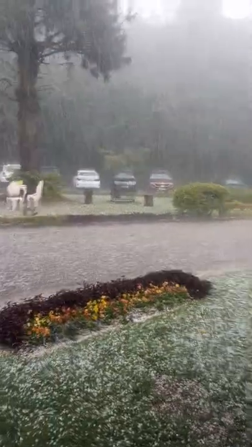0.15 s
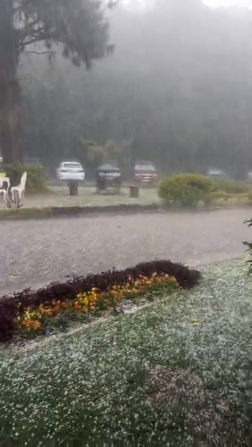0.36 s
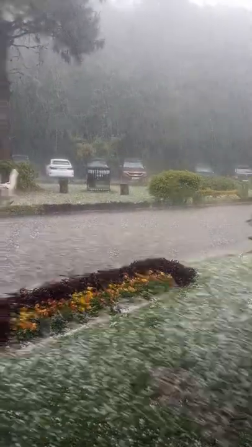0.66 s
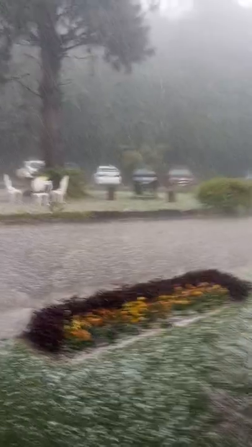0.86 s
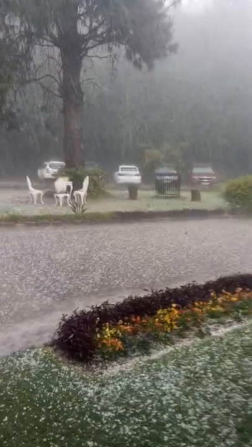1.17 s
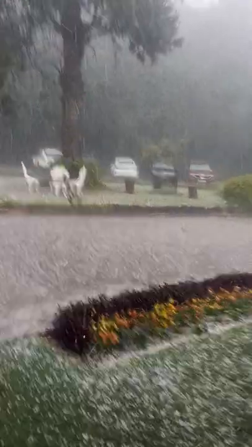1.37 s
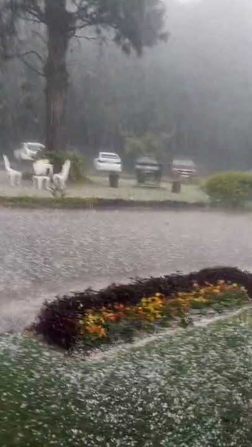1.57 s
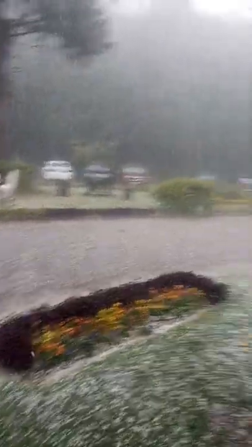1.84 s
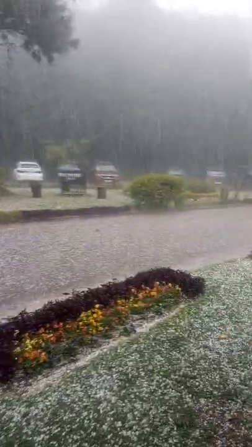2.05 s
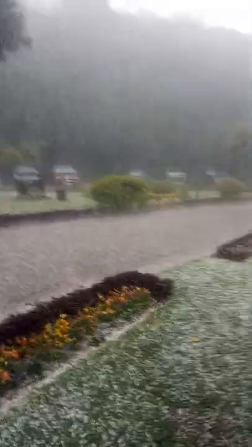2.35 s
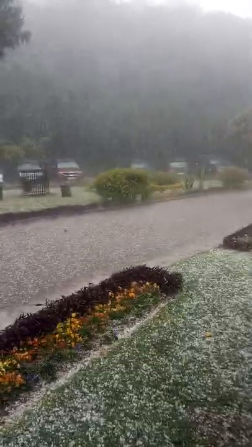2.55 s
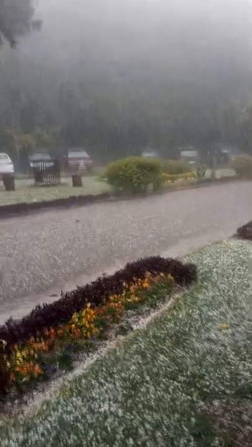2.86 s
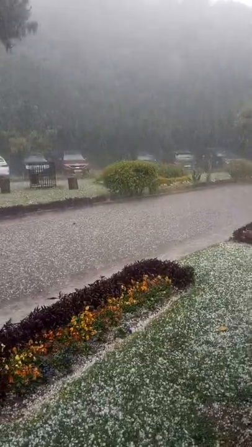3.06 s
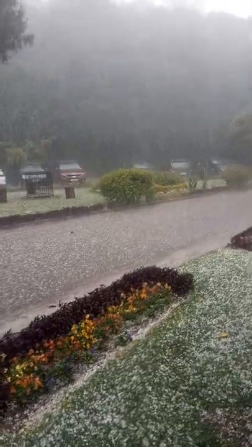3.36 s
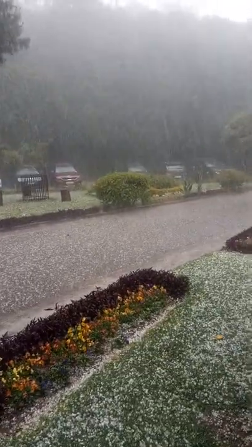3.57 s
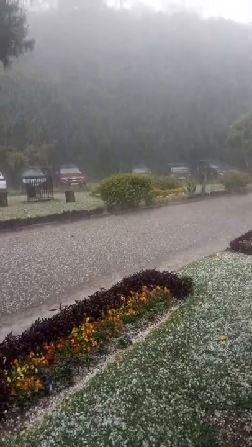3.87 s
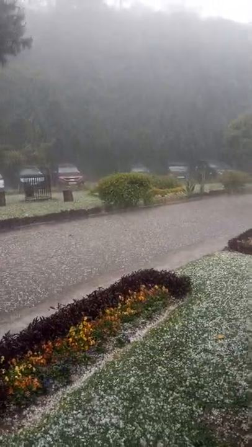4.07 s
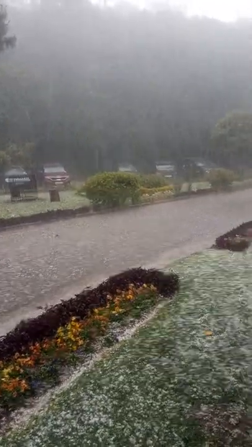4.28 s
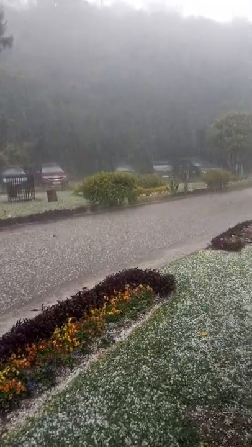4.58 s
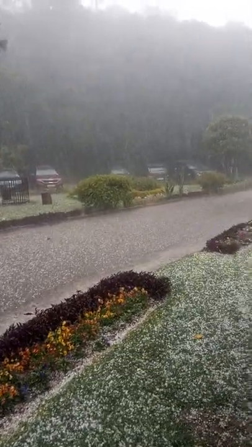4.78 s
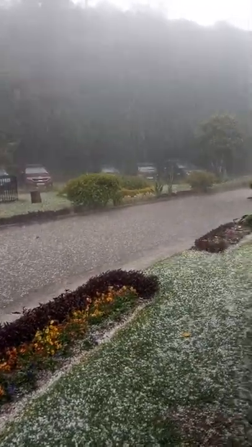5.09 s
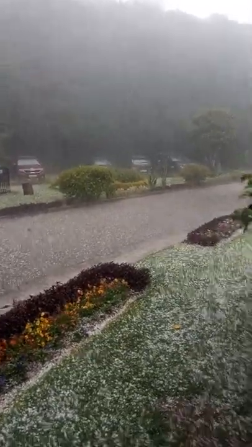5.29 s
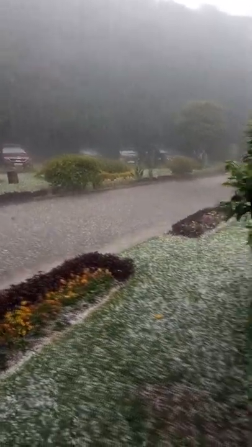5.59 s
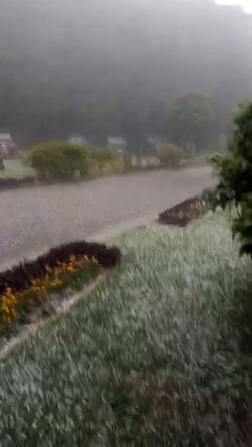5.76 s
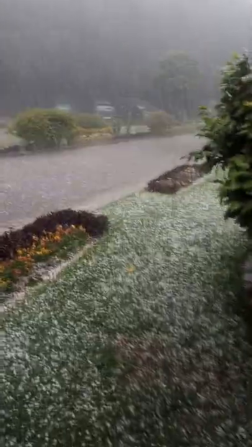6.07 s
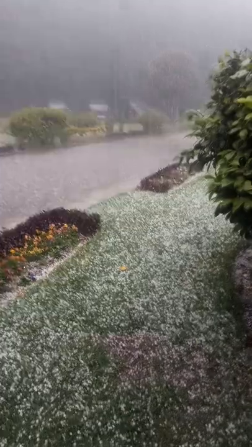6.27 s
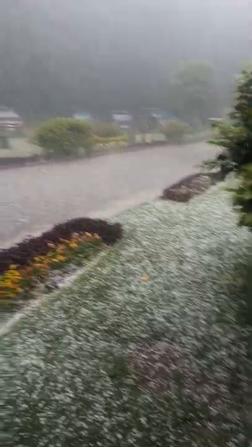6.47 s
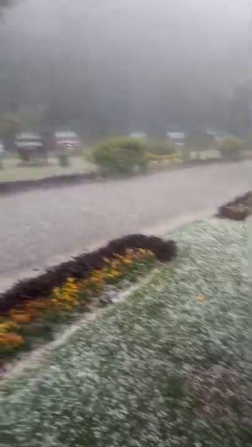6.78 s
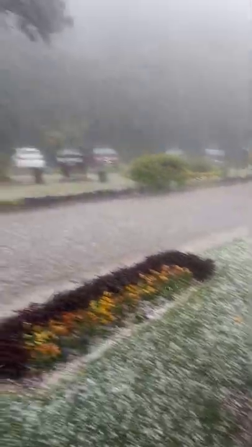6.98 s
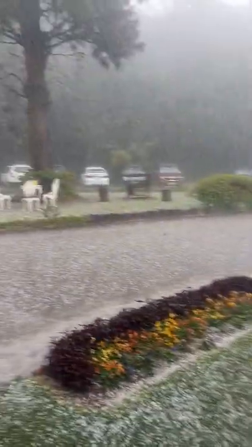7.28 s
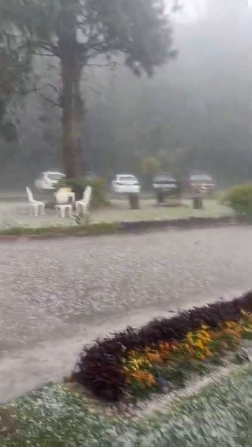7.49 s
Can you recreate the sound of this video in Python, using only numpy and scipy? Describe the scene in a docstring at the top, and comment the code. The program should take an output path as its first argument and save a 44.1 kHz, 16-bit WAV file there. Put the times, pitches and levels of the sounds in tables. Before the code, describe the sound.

A loud outdoor hailstorm roars steadily on grass and pavement, with fine ticking pellets, a few sharper close hits and gritty overloaded treble.

```python
"""A heavy hailstorm roars and hisses on a lawn, a road and shrubs, easing to a lull and picking up again.
Countless far stones merge into shaped noise; nearer ones patter as short knocks and tick as bare clicks.
A few close stones ring as fading sine tones; a faint rumble and soft low pops lie far below the roar.
The storm overloads the small microphone at the resonance of its port, adding fizz to the treble."""
import sys
import numpy as np
from scipy import signal
from scipy.io import wavfile
from scipy.ndimage import uniform_filter1d

SR = 44100
rng = np.random.default_rng(int(sys.argv[2]) if len(sys.argv) > 2 else 0)


def dump_mix(stems):
    """Bounce the given channels to the path in sys.argv[1] as a 16-bit WAV at rate SR."""
    frames = np.atleast_2d(stems).T  # one column per channel
    limited = np.clip(frames, -1, 1)  # hard clip at full scale
    pcm = np.round(limited * 32767).astype(np.int16)
    wavfile.write(sys.argv[1], SR, pcm)


N = 336924
TIME = np.arange(N) / SR  # seconds


def gain_of(db):
    """Turns decibels into an amplitude factor."""
    return 10 ** (np.asarray(db) / 20)


def evened(x):
    """Scales a signal to an rms (average strength) of one."""
    return x / np.sqrt(np.mean(x ** 2) + 1e-20)


def read(points, hz):
    """Reads a level in dB between the points of a spectrum, along a log-frequency axis."""
    point_hz, point_db = np.transpose(points)
    return np.interp(np.log(hz + 1), np.log(point_hz + 1), point_db)


def colour(x, db_at, size=4096):
    """Filters without looking ahead (minimum phase); db_at gives the gain in dB at each frequency."""
    frequencies = abs(np.fft.fftfreq(size, 1 / SR))
    log_gain = np.log(gain_of(db_at(frequencies)))
    # the Hilbert transform of the log gain supplies the matching phase
    response = np.fft.ifft(np.exp(signal.hilbert(log_gain).conj())).real
    return signal.oaconvolve(x, response[:size // 2])[:N]


def impacts(per_s, spread_db):
    """Makes clicks at random moments and of random sign: many small, a few large."""
    hit = rng.random(N) < per_s / SR
    luck = rng.laplace(size=N)[hit]
    sizes = gain_of(spread_db * np.minimum(abs(luck), 4))
    clicks = np.zeros(N)
    clicks[hit] = np.sign(luck) * sizes
    return clicks


def ring(hz, t60):
    """One struck mode: a sine that dies away by 60 dB in t60 seconds."""
    t = TIME[:SR // 6]
    return np.sin(2 * np.pi * hz * t) * np.exp(-np.log(1000) * t / t60)


def strikes(rows):
    """Places single blows in time, each ringing one mode."""
    out = np.zeros(N)
    for start_s, db, hz, t60 in rows:
        sound = gain_of(db) * ring(hz, t60)
        part = out[round(start_s * SR):][:len(sound)]
        part += sound[:len(part)]  # also writes into out
    return out


def wash(patchy_db, flicker_db, size=512):
    """Far stones merged into noise, arriving in flurries that differ from band to band."""
    hop = size // 4
    real, imag, patches = rng.standard_normal((3, N // hop + 5, size // 2 + 1))
    # smooth the patches over time, then over neighbouring bands
    patches = uniform_filter1d(patches, size=16, axis=0)
    patches = evened(uniform_filter1d(patches, size=8, axis=1))
    # the flicker moves all bands together
    flicker = evened(uniform_filter1d(rng.standard_normal(len(real)), size=20))[:, None]
    field = (real + 1j * imag) * gain_of(patchy_db * patches + flicker_db * flicker)
    noise = signal.istft(field.T, nperseg=size, noverlap=size - hop)[1]
    return evened(noise[:N])


def patter(per_s, spread_db, cycles, count=24):
    """Nearer stones: leaves and patches of ground answer with short knocks, at one of count pitches."""
    out = np.zeros(N)
    for hz in np.geomspace(300, 5000, count):
        knock = ring(hz, cycles * rng.uniform(0.34, 2.2) / hz)
        knocks = signal.oaconvolve(impacts(per_s / count, spread_db), knock)[:N]
        out += np.sqrt(hz) * evened(knocks)
    return evened(out)


def fall_db():
    """How far the fall stands above its lull, in dB: it eases steadily, then picks up again."""
    lull_s, ease_db_per_s, pick_up_db_per_s = 6, 0.3, 0.25
    before = ease_db_per_s * np.maximum(lull_s - TIME, 0)
    after = pick_up_db_per_s * np.maximum(TIME - lull_s, 0)
    return before + after


def rumble(count=256):
    """A faint low noise that swells unevenly and slowly fades."""
    # tone of the rumble before its overall level is set: (frequency [Hz], level [dB])
    rumble_tone = [(20, -3), (70, 0), (110, 0), (220, -23), (600, -70)]
    level_db, swing_db, lump_s, fade_db_per_s = -63.5, 3, .12, 1.5
    lumps = np.interp(TIME / lump_s, np.arange(count), rng.standard_normal(count))
    swell = gain_of(swing_db * lumps - fade_db_per_s * TIME)
    noise = colour(rng.standard_normal(N), lambda hz: read(rumble_tone, hz))
    return gain_of(level_db) * evened(swell * noise)


def low_pops():
    """Soft low pops under the roar: quickly fading sines of one pitch and ring time."""
    # the pops: (time [s], starting level [dB])
    pop_times = [(.894, -39), (1.452, -41), (1.917, -35), (2.416, -36), (3.598, -39), (4.276, -27)]
    pitch_hz, t60_s = 60, .025
    return strikes([(start_s, db, pitch_hz, t60_s) for start_s, db in pop_times])


def close_stones():
    """A few close stones, each ringing with a single fading tone."""
    # stones, before the microphone: (time [s], starting level [dB], pitch [Hz], ring time to -60 dB [s])
    stone_hits = [(.697, -7, 3700, .03), (.8945, -1.5, 3040, .06), (2.403, -7, 1660, .06),
                  (3.595, -16, 520, 0.039), (4.884, -7, 1560, 0.043), (5.189, -10, 3000, .04),
                  (6.275, -10, 3250, .08)]
    return strikes(stone_hits)


def road(ticks_db=-6):
    """Hail and rain hiss on the road as treble noise, with the dry clicks of single pellets."""
    # tone of ice and water shattering, before its level is set: (frequency [Hz], level [dB])
    hiss_tone = [(1500, -26), (3500, -7.5), (4800, -1.5), (8000, 0), (9000, -1.5), (11000, -6), (16000, -7)]
    lull_db = -15.5  # level at the lull, before the microphone
    ticks = evened(impacts(per_s=1800, spread_db=4.5))
    fall = wash(patchy_db=1.0, flicker_db=0.4) + gain_of(ticks_db) * ticks
    hiss = evened(colour(fall, lambda hz: read(hiss_tone, hz)))
    return gain_of(lull_db + fall_db()) * hiss


def lawn(near_db=-12):
    """Hail roars on grass and foliage as merged noise, with near knocks standing a little out of it."""
    # tone of stones on turf and leaves, before its level is set: (frequency [Hz], level [dB])
    roar_tone = [(30, -27), (120, -15.5), (250, -9), (450, -4.5), (800, -2.5), (1000, -3), (1250, -0.6),
                 (1720, 0.85), (2080, -2), (2450, -2.5), (3230, 0.5), (3550, -3.5), (4200, -4.5),
                 (5600, -19.5)]
    lull_db = -13.5  # level at the lull, before the microphone
    near = patter(per_s=1800, spread_db=3, cycles=14)
    fall = wash(patchy_db=0.4, flicker_db=0.3) + gain_of(near_db) * near
    roar = evened(colour(fall, lambda hz: read(roar_tone, hz)))
    return gain_of(lull_db + fall_db()) * roar


def scene():
    """The whole storm at one microphone, alike in both channels."""
    storm = lawn() + road() + close_stones()
    return np.array([storm, storm])


def port_db(hz):
    """The microphone's port resonates, lifting a band of the treble around its own pitch."""
    centre_hz, width_hz, peak_db = 7270, 2500, 15
    return peak_db / (1 + (2 * (hz - centre_hz) / width_hz) ** 4)


def record(dry):
    """Port resonance, overload, equaliser, faint low end, full-scale clipping and a treble limit."""
    # the equaliser cuts the bass and tames the port: (frequency [Hz], gain [dB])
    equaliser = [(30, -48), (80, -29), (120, -18), (170, -12.5), (260, -6), (420, -3), (1000, -1),
                 (4300, -0.5), (5300, -3), (5800, -5), (6300, -8), (6800, -11), (7750, -10.5), (8500, -11),
                 (9500, -3.5), (15500, -3)]
    drive, edge_hz = 2.2, 15760  # how hard the sound pushes into overload; upper limit of the band
    # the port's band takes up the headroom: its peaks flatten and throw fizz into the treble
    overloaded = np.tanh(drive * colour(dry.mean(0), port_db))
    voiced = colour(overloaded, lambda hz: read(equaliser, hz))
    voiced = voiced + rumble() + low_pops()
    low_pass = signal.firwin(1023, edge_hz, window=("kaiser", 7), fs=SR)
    limited = signal.oaconvolve(np.clip(voiced, -1, 1), low_pass, "same")
    return np.tile(limited, (len(dry), 1))


dry = scene()
out = record(dry)
dump_mix(out)
```